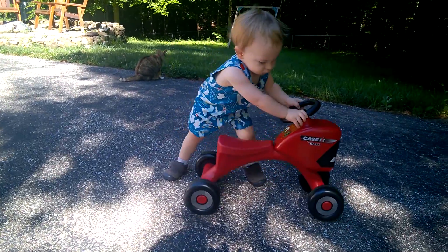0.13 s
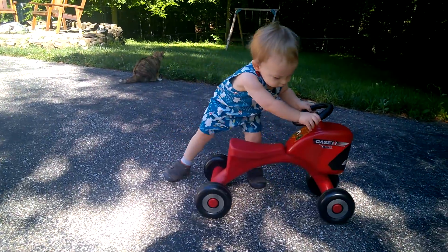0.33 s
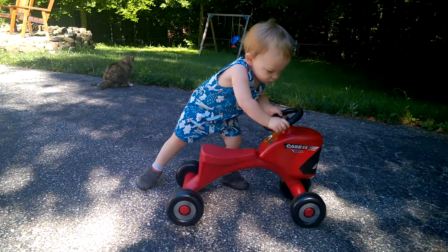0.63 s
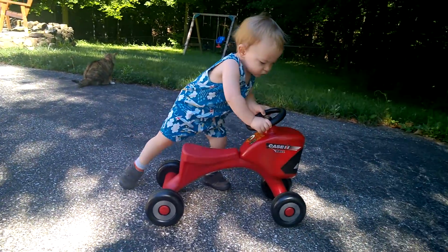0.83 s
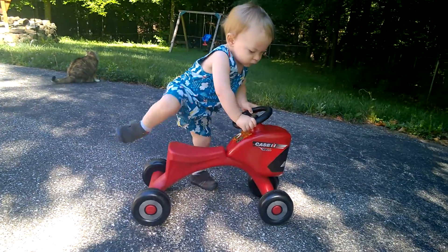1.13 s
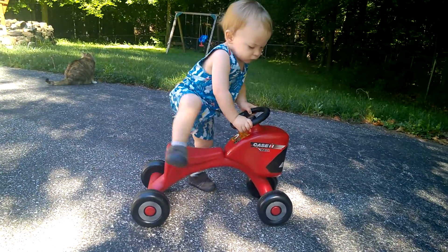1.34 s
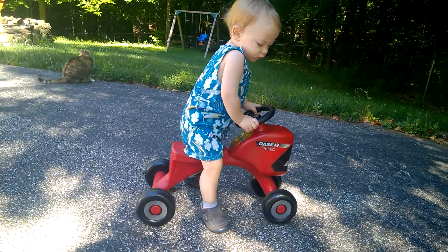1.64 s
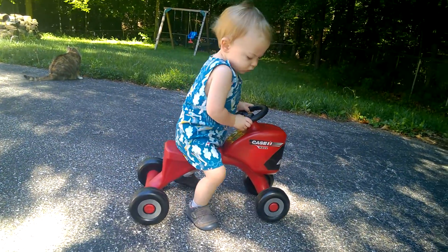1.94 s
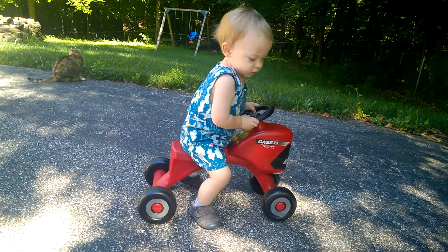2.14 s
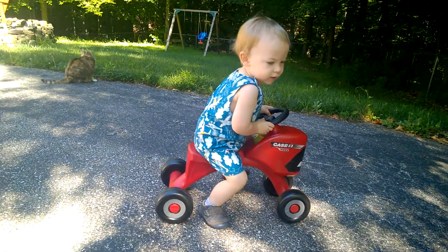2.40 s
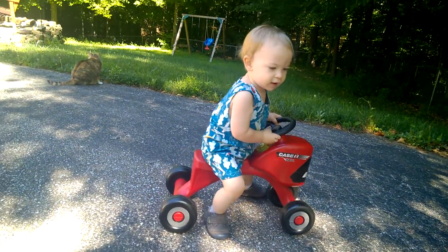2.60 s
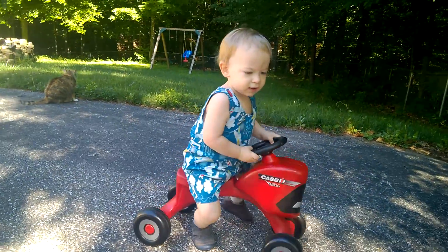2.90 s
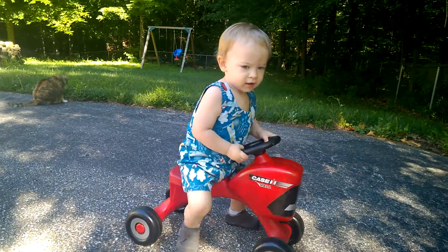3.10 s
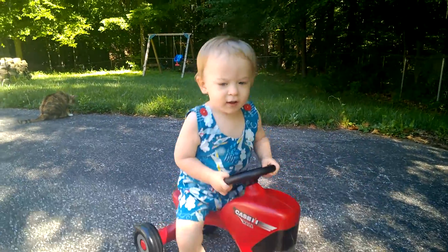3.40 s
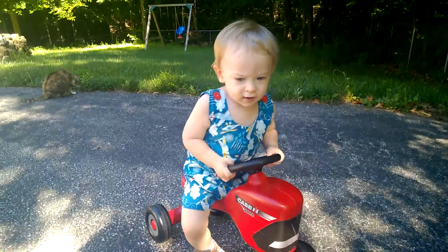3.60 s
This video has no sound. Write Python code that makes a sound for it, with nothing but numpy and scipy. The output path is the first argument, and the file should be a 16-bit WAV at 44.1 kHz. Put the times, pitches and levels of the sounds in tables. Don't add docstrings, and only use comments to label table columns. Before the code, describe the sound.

Hard plastic wheels clatter and stop, soles scuff softly on grit, a short knocking push follows, then strong rumbling and scraping bursts finish, heard close up outdoors over faint leaves and distant traffic.

```python
import sys
import numpy as np
from scipy import signal
from scipy.fft import rfft, irfft
from scipy.io import wavfile
from scipy.ndimage import uniform_filter1d

SR = 44100
rng = np.random.default_rng(int(sys.argv[2]) if len(sys.argv) > 2 else 0)


def amplitude_ratio(level_db):
    exponent = np.asarray(level_db, float) / 20
    return 10 ** exponent


def store_pcm(level_fs):
    pcm = np.round(np.clip(level_fs, -1, 1) * 32767).astype(np.int16)
    wavfile.write(sys.argv[1], SR, np.atleast_2d(pcm).T)


N = 165375
TIME = np.arange(N) / SR

# frequency in Hz, level in dB per Hz.
YARD_COLOUR = [(20, -17.5), (60, -9.5), (130, -17), (250, -26.5), (600, -29.5), (3000, -32.5), (10000, -43),
               (16000, -58.5)]
# frequency in Hz, shared part from 0 to 1.
YARD_COHERENCE = [(100, .7), (1000, .8), (4000, .3)]
YARD_DB = -60.5
HUM_HZ, HUM_WIDTH_HZ, HUM_DB = 116.4, 8, -61.5
HUM_RISE_S, HUM_RISE_DB = 1.15, 5

# time in seconds, level in dB.
PUSHES = [
    [(0, -33), (.04, -36), (.1, -37), (.135, -52), (.26, -54.5), (.42, -55), (.46, -69)],
    [(.53, -63), (.6, -54), (.66, -60), (.7, -67)],
    [(1.46, -72), (1.6, -56), (1.63, -42), (1.74, -44), (1.82, -59.5), (2.07, -55.5), (2.22, -64.5),
     (2.27, -89)],
    [(2.55, -77), (2.72, -49.5), (2.74, -43), (2.8, -31.5), (2.89, -19), (3.02, -27.5), (3.1, -30.5),
     (3.13, -40.5), (3.25, -33.5)],
    [(3.25, -39), (3.29, -27.5), (3.43, -26.5), (3.475, -15.5), (3.51, -26.5), (3.6, -36.5), (3.67, -31),
     (3.75, -31.5)],
]
BOOM_DB = [-13.5, -30.5, -17.5, -12.5, -13]
BOOM_FOLLOW = 0.75
BUMPS_PER_S, BUMP_SPREAD_DB, SPOT_SPREAD_DB = 1300, 5.5, 3.5

# time in seconds, level in dB.
STROKES = [
    [(0, -45.5), (.055, -44), (.11, -49), (.14, -63.5), (.21, -58), (.45, -70)],
    [(.54, -76), (.61, -53.5), (.67, -62), (.72, -73)],
    [(1, -76.5), (1.2, -65.5), (1.29, -71.5), (1.38, -62), (1.46, -72), (1.54, -61.5), (1.6, -69),
     (1.7, -56), (1.81, -69), (2.07, -62), (2.15, -81)],
    [(2.17, -59.5), (2.235, -57.5), (2.25, -65), (2.4, -70), (2.42, -53), (2.52, -67.5), (2.72, -50),
     (2.78, -44.5)],
    [(2.78, -37), (2.89, -28), (3.02, -35), (3.04, -39.5), (3.16, -43.5), (3.26, -40.5)],
    [(3.26, -36.5), (3.37, -31), (3.48, -30.5), (3.55, -37), (3.61, -46.5), (3.68, -36.5), (3.75, -50)],
]
DUST_DB = [-4, -9, -4.5, -7.5, -23, -12.5]
# frequency in Hz, level in dB per Hz.
GRIT_COLOUR = [(1500, -19), (2400, -10.5), (3900, -5), (4800, -11.5), (5500, -7), (6200, -9.5), (7000, -10),
               (8200, -17), (16000, -28.5)]
GRAINS_PER_S, GRAIN_SPREAD_DB = 3700, 3.5
HUB_HZ, HUB_WIDTH_HZ, HUB_DB, HUB_FROM_S = 1990, 43, -3, 2.55
WIDE_HUB_HZ, WIDE_HUB_DB = 2090, -7

# start in
# seconds, peak in dB, boom in dB, ring in Hz, rattle share.
KNOCKS = [(0.015, -31, -21, 1080, 0.33), (0.052, -11.5, -21, 1090, 0.77), (0.057, -12.5, -9, 900, 0.66),
          (0.063, -8, -34, 1310, 0.22), (0.084, -24.5, -12, 1410, 0.45), (0.093, -24, -4.5, 1390, 0.54),
          (0.161, -23.5, -26, 1310, 0.8), (0.169, -24, -10, 720, 0.49), (0.198, -31.5, -4, 802, 0.88),
          (0.242, -36, -12, 684, 0.4), (0.322, -42.5, 3.5, 1210, 1), (0.366, -35.5, -22, 1220, 0.17),
          (0.401, -40.5, -10, 674, 0.7), (0.517, -39.5, -17, 960, 0.32), (1.614, -33.5, -22, 1070, 0.35),
          (1.619, -32.5, -5, 1200, 0.55), (1.6287, -15, -8.5, 1580, 0.022), (1.7024, -22.5, -10, 696, 0.12),
          (1.721, -32, -10, 1110, 0.62), (1.728, -31, -5, 1300, 0.34), (1.781, -33.5, -25, 1170, 0.13),
          (1.962, -38, -25, 1290, .2), (2.055, -42.5, -7, 700, 0.65), (2.313, -52, 0.5, 614, 0.57),
          (2.414, -34, -1, 1243, 0.024), (2.582, -35, -33, 2150, 0.11), (2.73, -18.5, -7.5, 1290, 0.29),
          (2.75, -16.5, -4.5, 1135, 0.44)]
# start in seconds, peak in dB, wheel ring in Hz.
JOLTS = [(2.786, -16.5, 1990), (2.819, -11.5, 1480), (2.833, -7.5, 900), (2.846, -19, 1990),
         (2.868, -2.5, 1470), (2.873, -4, 1440), (2.877, -4, 1680), (2.891, -13, 1370), (2.9, -9, 1020),
         (2.919, -7.5, 1490), (2.93, -15, 1180), (2.948, -10, 1470), (2.981, -7.5, 1500),
         (2.998, -16, 1530), (3.011, -6.5, 1500), (3.041, -12.5, 1460), (3.058, -11, 1480),
         (3.084, -22, 1420), (3.093, -10, 1290), (3.109, -18.5, 1360), (3.141, -8.5, 1430),
         (3.187, -15, 1460), (3.201, -15, 1190), (3.279, -15.5, 870), (3.306, -17.5, 830),
         (3.363, -18.5, 810), (3.375, -19, 800), (3.396, -21, 840), (3.629, -15, 1350),
         (3.662, -17.5, 1940), (3.675, -20, 800), (3.703, -8, 1390), (3.71, -15, 1560), (3.726, -18, 1390),
         (3.738, -11, 1590)]
# start in seconds, peak in dB, wheel ring in Hz.
SKID = [(3.435, -10.5, 900), (3.444, -10, 1264), (3.445, -15.5, 3370), (3.458, -4.5, 948),
        (3.461, -8.5, 810), (3.468, -2.5, 1984), (3.474, -2, 2600), (3.487, -7.5, 3230), (3.487, -6, 1004),
        (3.491, -3, 1210), (3.496, -4, 766), (3.504, -13, 2600), (3.509, -13.5, 1453)]
JOLT_BOOM_DB, JOLT_RATTLE, JOLT_SHELL_DB, KNOCK_SHELL_DB = -16, 0.3, -7.5, -5
THUD_HZ, THUD_DB, RATTLE_S, WHEEL_WIDTH_HZ = 144.3, -16.5, 0.009, 200
# frequency in Hz, width in Hz, level in dB.
SHELL_MODES = [(653.6, 88, 6), (810, 71, 10), (964, 200, 4), (1210, 87, 7.5), (1373, 134, 2),
               (1590, 110, 3.5), (1800, 196, 0), (2600, 140, -6.5), (3564, 350, -10)]
CAVITY_HZ = (258.5, 329.2)
CAVITY_WIDTH_HZ = 87

# start in seconds, peak in dB, centre in Hz.
TICKS = [(0.0443, -25.5, 3410), (0.0571, -17.5, 3200), (0.161, -18.5, 4450), (0.169, -17.5, 4750),
         (0.2004, -21.5, 4640), (0.288, -30, 2930), (0.3426, -40, 3670), (0.5506, -38.5, 3280),
         (0.5671, -45, 9100), (0.599, -36, 4180), (0.607, -35, 3950), (0.6355, -36, 3580),
         (0.7012, -43.5, 6300), (1.026, -46.5, 3170), (1.0804, -37, 4170), (1.333, -47.5, 2050),
         (1.3548, -39.5, 4020), (1.378, -44, 1870), (1.6288, -20.5, 2700), (1.703, -23, 3580),
         (1.73, -34, 3020), (1.8312, -43, 3500), (1.8808, -31.5, 5300), (1.9613, -31.5, 4500),
         (2.184, -37, 3440), (2.414, -28.5, 4490), (2.582, -37.5, 3500), (2.6437, -39, 7000),
         (2.7056, -40, 3690)]
# start in seconds, peak in dB, centre in Hz.
SNAPS = [(2.785, -15.5, 3600), (2.875, -9, 4060), (2.889, -13, 6060), (3.0204, -38, 3330),
         (3.2254, -22.5, 3900), (3.2439, -39, 4290), (3.2678, -19, 3850), (3.3207, -23, 4320),
         (3.4554, -14.5, 7500), (3.479, -25, 5990), (3.4863, -11, 5520), (3.526, -4, 6790),
         (3.54, -13.5, 6840), (3.5631, -16.5, 6060), (3.7028, -21, 3700)]
TICK_S = 0.001

# time in seconds, level in dB, pitch in Hz.
SQUEAK = [
    (0.83, -73, 639),
    (.85, -61, 663),
    (.872, -52, 709),
    (.918, -53, 683),
    (0.953, -71, 670),
]

# frequency in Hz, shared part from 0 to 1.
COHERENCE = [(700, .97), (2500, .8), (6000, .45), (12000, .4)]
# frequency in Hz, left minus right in dB.
BALANCE = [(300, 1), (1000, 1.5), (2200, 4), (5000, 5), (9000, 3.5), (14000, 0.5)]
# frequency in Hz, left's lead in radians.
PHASE = [(3500, 0), (6500, -1.5), (12000, -2.2)]
EDGE_HZ = 15900


def evened(x):
    return x / np.sqrt(np.mean(x ** 2) + 1e-20)


def read(points, hz):
    f, value = np.transpose(points)
    return np.interp(np.log(hz + 1), np.log(f + 1), value)


def coloured(x, spectrum):
    gain = amplitude_ratio(read(spectrum, np.fft.rfftfreq(N, 1 / SR)))
    return evened(irfft(rfft(x) * gain, N))


def add(mix, s, sound):
    part = mix[..., round(s * SR):][..., :sound.shape[-1]]
    part += sound[..., :part.shape[-1]]


def resonate(x, hz, width):
    r = np.exp(-np.pi * width / SR)
    return 2 * signal.lfilter([1 - r], [1, -r * np.exp(2j * np.pi * hz / SR)], x).real


def resonate_twice(x, hz, first_width, second_width):
    return resonate(resonate(x, hz, first_width), hz, second_width)


def envelope(s, db):
    return amplitude_ratio(np.interp(TIME, s, db, left=-150, right=-150))


def level(curves):
    return sum(envelope(*np.transpose(c)) for c in curves)


def clicks(per_s, spread_db):
    size = amplitude_ratio(spread_db * np.minimum(rng.exponential(1, N), 4)) * rng.choice([-1., 1.], N)
    return size * (rng.random(N) < per_s / SR)


def drift(size):
    smooth = uniform_filter1d(rng.standard_normal(N), size)
    return evened(uniform_filter1d(smooth, size))


def decaying_noise(length, decay_s):
    return rng.standard_normal(length) * amplitude_ratio(-60 * np.arange(length) / SR / decay_s)


def ports(x, other, same=COHERENCE):
    hz = np.fft.rfftfreq(N, 1 / SR)
    c = np.clip(read(same, hz), 0, 1)
    half = amplitude_ratio(read(BALANCE, hz) / 2) * np.exp(0.5j * read(PHASE, hz))
    a, b = rfft(x), rfft(other)
    left = a * half
    right = (c * a + np.sqrt(1 - c ** 2) * b) / half
    return irfft(np.array([left, right]), N)


def shell(forces):
    ring = 0
    for k, (force, (hz, width, db)) in enumerate(zip(forces, SHELL_MODES)):
        ring = ring + (-1) ** k * amplitude_ratio(db) * resonate(force, hz, width)
    band = signal.butter(3, [400, 4200], "bandpass", fs=SR, output="sos")
    return signal.sosfilt(band, ring)


def cavity(force):
    return sum(resonate_twice(force, hz, 2 * CAVITY_WIDTH_HZ, CAVITY_WIDTH_HZ) for hz in CAVITY_HZ)


def yard():
    pair = [coloured(rng.standard_normal(N), YARD_COLOUR) for _ in range(2)]
    hum = evened(resonate(rng.standard_normal(N), HUM_HZ, HUM_WIDTH_HZ))
    before_rise = np.clip((HUM_RISE_S - TIME) / 0.11, 0, 1)
    hum = hum * amplitude_ratio(drift(size=2500) - HUM_RISE_DB * before_rise)
    return amplitude_ratio(YARD_DB + 0.77 * drift(size=4000)) * ports(*pair, YARD_COHERENCE) + amplitude_ratio(HUM_DB) * hum


def rolling():
    load = level(PUSHES) * amplitude_ratio(1.4 * drift(size=250))
    boom = sum(amplitude_ratio(db) * level([push]) ** BOOM_FOLLOW for db, push in zip(BOOM_DB, PUSHES))
    bumps = clicks(BUMPS_PER_S, BUMP_SPREAD_DB) + 0.48 * rng.standard_normal(N)
    forces = [bumps * amplitude_ratio(SPOT_SPREAD_DB * drift(size=400)) for _ in SHELL_MODES]
    near = evened(shell(forces)) * load + evened(cavity(bumps)) * boom
    unrelated = evened(shell([rng.standard_normal(N)] * len(SHELL_MODES))) * load
    return ports(near, unrelated)


def scraping():
    tail = decaying_noise(300, 0.0026)
    load = level(STROKES) * amplitude_ratio(2.2 * drift(size=70))
    grains = []
    for _ in range(2):
        crunch = signal.oaconvolve(clicks(GRAINS_PER_S, GRAIN_SPREAD_DB), tail)[:N]
        grains.append(crunch + 5.8 * rng.standard_normal(N))
    hub = amplitude_ratio(HUB_DB) * evened(resonate(grains[0], HUB_HZ, HUB_WIDTH_HZ)) * (TIME > HUB_FROM_S)
    wide_hub = amplitude_ratio(WIDE_HUB_DB) * evened(resonate_twice(grains[1], WIDE_HUB_HZ, 720, 700))
    body = hub + wide_hub * (TIME > 1) * (TIME < 1.5)
    return ports(*[(coloured(g, GRIT_COLOUR) + body) * load for g in grains])


def dust():
    load = sum(amplitude_ratio(db) * level([stroke]) for db, stroke in zip(DUST_DB, STROKES))
    load = load * amplitude_ratio(4.8 * drift(size=150))
    high = signal.butter(3, 8000, "highpass", fs=SR, output="sos")
    return ports(*evened(signal.sosfilt(high, rng.standard_normal((2, N)))) * load)


def blow(chance, db, boom_db, ring_hz, rattle, shell_db):
    t = np.arange(len(chance)) / SR
    force = chance * np.exp(-(t / RATTLE_S) ** 2) * rattle + (t < 0.0002)
    shares = amplitude_ratio(7.5 * chance[-len(SHELL_MODES):])
    parts = [(shell_db, shell([force * share for share in shares])),
             (boom_db, cavity(force)),
             (boom_db + THUD_DB, resonate_twice(force, THUD_HZ, 110, 110)),
             (-3, resonate_twice(force, ring_hz, 900, WHEEL_WIDTH_HZ))]
    return sum(amplitude_ratio(db + part_db) * part / abs(part).max() for part_db, part in parts)


def blows():
    rows = [(*row, KNOCK_SHELL_DB) for row in KNOCKS]
    for s, db, hz in list(JOLTS) + list(SKID):
        rows.append((s, db, JOLT_BOOM_DB, hz, JOLT_RATTLE, JOLT_SHELL_DB))
    out = np.zeros((2, N))
    for (s, *settings), chance in zip(rows, rng.standard_normal((len(rows), 2, 2000))):
        add(out, s, np.array([blow(c, *settings) for c in chance]))
    return ports(*out)


def ticks():
    out, t = np.zeros((2, N)), np.arange(900) / SR
    rows = list(TICKS) + list(SNAPS)
    for (s, db, hz), chance in zip(rows, rng.standard_normal((len(rows), 2, 900))):
        puff = chance * (np.exp(-t / TICK_S) + 0.22 * np.exp(-t / 0.0095))
        centre = np.array([resonate_twice(p, hz, hz, 0.26 * hz) for p in puff])
        octave = np.array([resonate_twice(p, 2 * hz, 2 * hz, 2 * hz) for p in puff])
        snap = centre - 0.21 * octave
        add(out, s, amplitude_ratio(db) * snap / abs(snap).max())
    return ports(*out)


def squeak():
    s, db, hz = np.transpose(SQUEAK)
    pitch = np.interp(TIME, s, hz) * (1 + 0.036 * drift(size=120))
    tone = np.sqrt(2) * np.sin(2 * np.pi * np.cumsum(pitch) / SR) * amplitude_ratio(1.9 * drift(size=200))
    rub = evened(resonate(resonate(clicks(630, 2.1), 500, 970), 650, 460))
    rub = rub * (TIME > s[0]) * (TIME < s[-1])
    return envelope(s, db) * tone + amplitude_ratio(-64) * rub


def scene():
    toy = rolling() + scraping() + dust() + blows() + ticks()
    tail = decaying_noise(6000, 0.095)
    tail = tail / np.linalg.norm(tail)
    back = amplitude_ratio(-15) * signal.fftconvolve(toy, tail[None], axes=1)[:, :N]
    return toy + back + yard() + squeak()


def low_pass(x):
    return signal.sosfilt(signal.butter(12, 16970, fs=SR, output="sos"), x)


def record(dry):
    cut = signal.oaconvolve(dry, signal.firwin(255, EDGE_HZ, fs=SR)[None], "same")
    soft = cut / (1 + abs(cut) ** 4) ** 0.25
    return low_pass(soft)


dry = scene()
out = record(dry)
store_pcm(out)
```